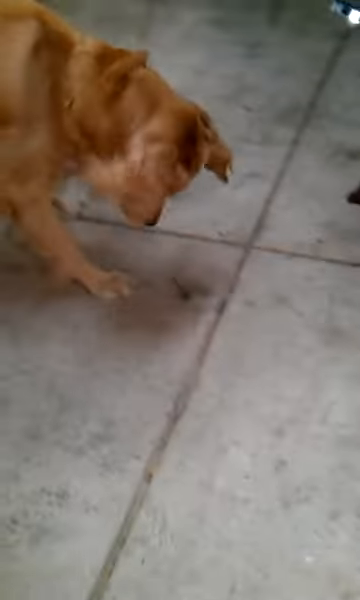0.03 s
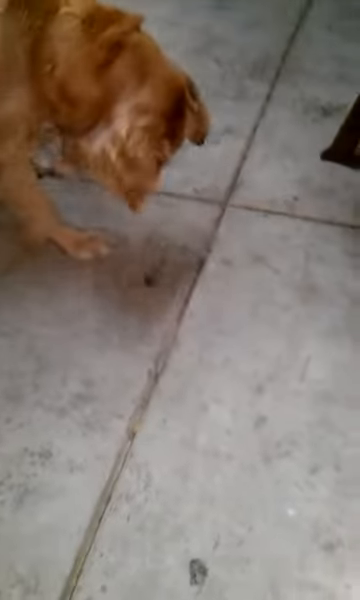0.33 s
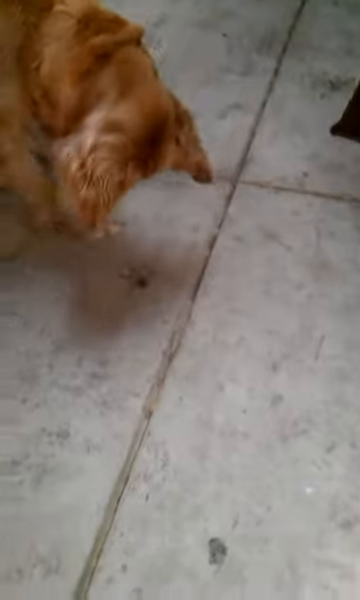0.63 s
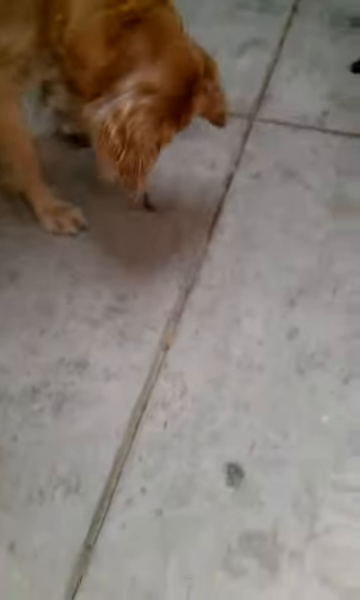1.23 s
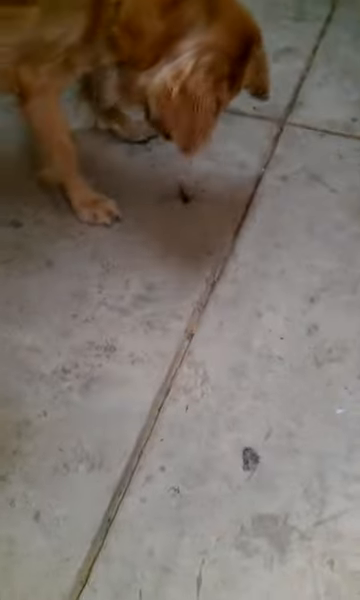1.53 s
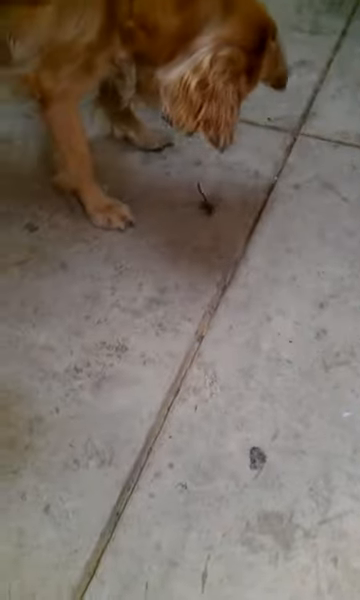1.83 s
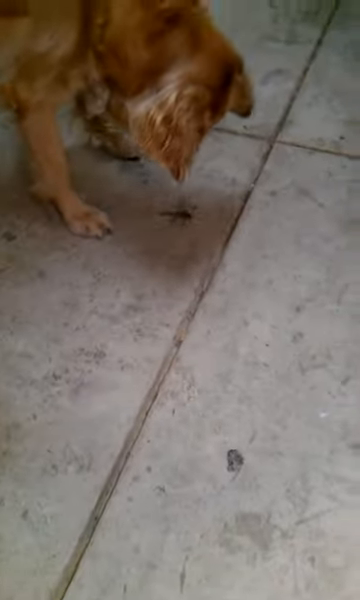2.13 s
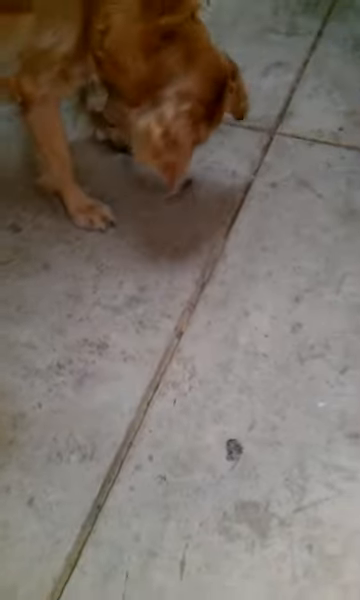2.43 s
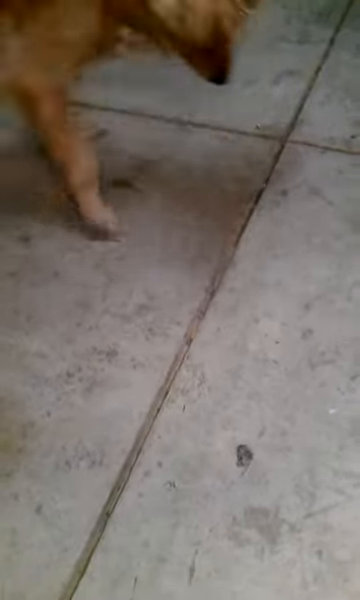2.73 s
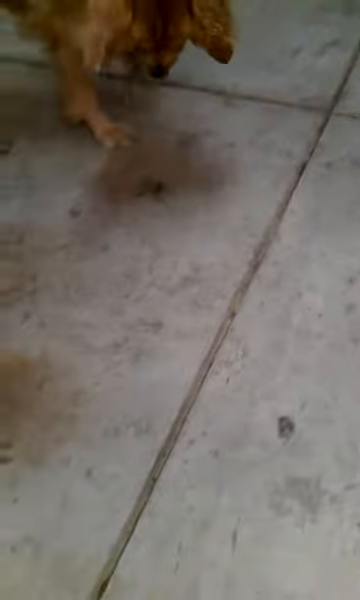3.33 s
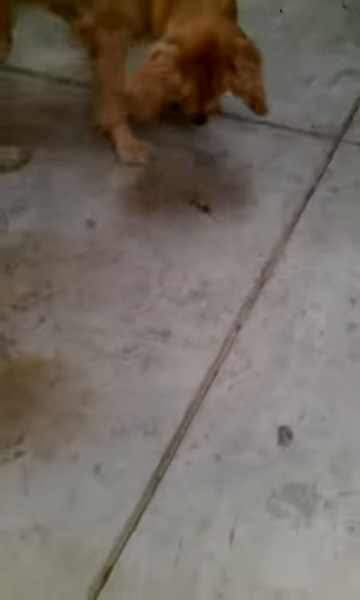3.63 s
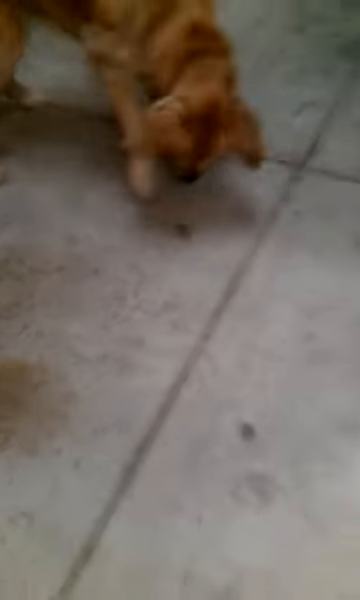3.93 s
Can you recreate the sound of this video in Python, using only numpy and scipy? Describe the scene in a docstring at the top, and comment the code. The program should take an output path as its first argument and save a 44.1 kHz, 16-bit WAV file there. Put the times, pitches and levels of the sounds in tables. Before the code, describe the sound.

Papery insect wings flutter and tick on a garage's concrete floor, fading while a dog's claws tap. One sharp knock sounds as the dog lunges, then the wings rattle again, with faint hiss and hum behind.

```python
"""A dog chases an insect

A large insect flutters on a concrete garage floor. Its dry wings rattle against it in bouts
of 25 to 35 strokes a second. A dog follows with soft paw steps and lunges once with a sharp,
clattering knock. Behind them are a low hiss, a faint hum and a few soft bumps."""
import sys
import numpy as np
from scipy import signal
from scipy.fft import rfft, irfft
from scipy.io import wavfile

SR = 44100
rng = np.random.default_rng(int(sys.argv[2]) if len(sys.argv) > 2 else 0)


def dump_mix(stems):
    """Bounce the given channels to the path in sys.argv[1] as a 16-bit WAV at rate SR."""
    frames = np.atleast_2d(stems).T  # one column per channel
    limited = np.clip(frames, -1, 1)  # hard clip at full scale
    pcm = np.round(limited * 32767).astype(np.int16)
    wavfile.write(sys.argv[1], SR, pcm)


N = 176400
TIME = np.arange(N) / SR


def amp(db):
    """Turns decibels into a gain."""
    return 10 ** (np.asarray(db) / 20)


def unit(x):
    """Scales a sound to an average power of 1."""
    return x / np.sqrt(np.mean(x ** 2) + 1e-20)


def look_up(points, hz):
    """Reads between a table's rows on a log frequency scale."""
    row_hz, value = np.transpose(points)
    return np.interp(np.log(hz + 1), np.log(row_hz + 1), value)


def add(mix, start_s, sound):
    """Mixes a sound in at its start time."""
    part = mix[max(round(start_s * SR), 0):][:len(sound)]
    part += sound[:len(part)]


def colour(x, tone, size=4096):
    """Filters a sound. The tone table sets only the balance of lows and highs."""
    log_gain = np.log(amp(look_up(tone, abs(np.fft.fftfreq(size, 1 / SR)))))
    ring = np.fft.ifft(np.exp(np.conj(signal.hilbert(log_gain)))).real[:size // 2]
    return signal.oaconvolve(x, ring / np.linalg.norm(ring))[:N]


def drift(rate_hz):
    """A random wander, mostly slower than the given rate."""
    rolloff = (1 + (np.fft.rfftfreq(N, 1 / SR) / rate_hz) ** 2) ** 2
    return unit(irfft(rfft(rng.standard_normal(N)) / rolloff, N))


def impulses(times, levels_db):
    """One spike for each contact."""
    out = np.zeros(N)
    for start, db in zip(times, levels_db):
        add(out, start, amp([db]))
    return out


def swells(rows):
    """Loudness curves that rise quickly and fall slowly."""
    out = np.zeros(N)
    for start, length, db in rows:
        add(out, start, amp(db) * np.sin(np.pi * np.linspace(0, 1, round(length * SR)) ** 0.58))
    return out


def rubbing(ticks, tick_share):
    """Blends ticks with smooth noise, sharing out the power."""
    return np.sqrt(tick_share) * unit(ticks) + np.sqrt(1 - tick_share) * rng.standard_normal(N)


# The garage's echo. Each row: frequency in Hz, seconds to fade by 60 dB.
ECHO_FADES = [(60,0.099),(600,0.21),(2500,0.098),(7500,0.18),(16000,0.15)]

def garage(x, echo_db):
    """Adds a short, dense tail of reflections."""
    hz, t, spectrum = signal.stft(rng.standard_normal(SR // 2), SR, nperseg=256)
    fade = amp(-60 * t / look_up(ECHO_FADES, hz)[:, None])
    tail = signal.istft(spectrum * fade, SR, nperseg=256)[1]
    tail *= np.minimum(np.arange(len(tail)) / SR / 0.0016, 1)
    return x + amp(echo_db) * signal.oaconvolve(x, tail / np.linalg.norm(tail))[:N]


def waver(hz, db):
    """A tone that wanders in pitch and level."""
    gain = amp(db + 2.86 * drift(rate_hz=4.6)) * np.sqrt(2)
    pitch = hz + 4 * drift(rate_hz=17.9)
    return gain * np.sin(2 * np.pi * np.cumsum(pitch) / SR)


# The tone of the hiss and of the bumps. Each row: frequency in Hz, relative level in dB.
HISS_TONE = [(20,-11),(55,-4),(100,-8.5),(190,-8.5),(350,-9),(560,-9),(750,-3.5),(950,-5),(1700,-3.5),(2400,1.5),(3200,-3),(4600,-8),(7500,-9.5),(9000,-22.5),(11500,-32),(16000,-25)]
BUMP_TONE = [(20,-10),(50,-1),(100,-8),(200,-14),(600,-40),(16000,-80)]
# The drone. Each row: time in seconds, pitch in Hz, level in dB.
DRONE_PATH = [(0,142.7,-65),(.5,143,-69.5),(.8,137,-71),(1.5,134,-70.5),(4,133,-73.5)]
# The hum. Each row: pitch in Hz, level in dB.
HUM_NOTES = [(360,-77),(403.5,-72),(672,-74),(748,-71),(808,-73),(1482,-75.5),(2420,-72)]
# The bumps. Each row: start in seconds, length in seconds, level in dB.
LOW_BUMPS = [(2.68,0.15,-60),(3.27,0.15,-60.5),(3.79,0.28,-63)]

def background():
    """A steady hiss, a distant drone, a faint hum and a few low bumps."""
    hiss = amp(-49 + .2 * drift(rate_hz=14)) * colour(rng.standard_normal(N), HISS_TONE)
    times, pitch, level = np.transpose(DRONE_PATH)
    drone = waver(np.interp(TIME, times, pitch), np.interp(TIME, times, level))
    hum = sum(waver(hz, db) for hz, db in HUM_NOTES)
    bumps = swells(LOW_BUMPS) * colour(rng.standard_normal(N), BUMP_TONE)
    return hiss + drone + hum + bumps


# The steps. Each row: start in seconds, pad level in dB, claw level in dB.
PAW_STEPS = [(0.089,-30,-35),(0.225,-36,-47),(.884,-28,-21.5),(1.3954,-30,-15.5),(1.3964,-31,-17.5),(1.3975,-20,-17),(1.404,-37,-22),(1.4085,-38,-25),(1.426,-28,-30),(2.708,-28.5,-44),(2.765,-26,-42),(2.948,-24,-45)]
# The scuffs. Each row: start in seconds, length in seconds, level in dB.
PAW_SCUFFS = [(.158,0.016,-41),(.184,.016,-44),(.704,.019,-39.5),(.724,.022,-44.5),(.805,.023,-36.5),(.825,.028,-41),(.853,.018,-43.5)]
# The tone of pads, claws and scuffs. Each row: frequency in Hz, relative level in dB.
PAD_TONE = [(30,-29),(150,-17),(240,-2),(500,-4),(900,-5),(2000,-28),(16000,-56)]
CLAW_TONE = [(100,-18),(600,-5.5),(1250,7.5),(1650,-1),(2250,8),(2800,-1),(3650,-2.5),(4700,-13),(5900,-14),(6750,-5),(8000,-15),(16000,-48)]
SCUFF_TONE = [(100,-30),(1200,-17),(2000,-2),(2600,4),(3300,3),(4500,-3),(7200,-1),(9000,-13),(16000,-30)]

def dog_paws(grit_per_s=1800):
    """Pads and claws land on the concrete and scuff along it."""
    times, pad_db, claw_db = np.transpose(PAW_STEPS)
    pads = colour(impulses(times, pad_db), PAD_TONE)
    claws = colour(impulses(times, claw_db), CLAW_TONE)
    grit = rng.standard_normal(N) * (rng.random(N) < grit_per_s / SR)
    scuffs = colour(swells(PAW_SCUFFS) * rubbing(grit, tick_share=.28), SCUFF_TONE)
    return garage(pads + claws + scuffs, echo_db=-5.5)


# The knock's contacts. Each row: start in seconds, click level in dB, relative thud level in dB.
CONTACTS = [(2.5387,1.5,-6),(2.5402,-6,-1),(2.5444,-13,-5.5),(2.5504,-24,-7),(2.5584,-1.5,-2.5),(2.5630,-0.5,-4),(2.5705,-11,2)]
# The tone of a click and of a thud. Each row: frequency in Hz, relative level in dB.
CLICK_TONE = [(60,-32),(1000,-12),(2400,-10),(3600,0),(4500,0),(5500,-8),(6500,-4.5),(7450,3),(8600,-5.5),(10500,-17),(11800,-23),(12600,-46),(16000,-60)]
THUD_TONE = [(25,-17),(75,7),(150,-1.5),(290,-6.5),(450,-14),(630,4),(850,-6.5),(1300,0),(2200,-3.5),(4000,-20.5),(9000,-23),(12600,-56),(16000,-68)]
# A thud's ring. Each row: pitch in Hz, relative level in dB, seconds to fade by 60 dB.
RING_NOTES = [(590,-58,.09),(650,-65,.2),(1320,-62,.13)]

def dog_lunge():
    """A quick clatter of hard contacts, each a click and a hollow thud with a short ring."""
    times, click_db, thud_db = np.transpose(CONTACTS)
    clicks = colour(impulses(times, click_db), CLICK_TONE)
    blows = impulses(times, thud_db)
    t = TIME[:SR // 3]
    ring = sum(amp(db - 60 * t / fade_s) * np.sin(2 * np.pi * hz * t) for hz, db, fade_s in RING_NOTES)
    thuds = amp(-8) * colour(blows, THUD_TONE) + signal.oaconvolve(blows, ring)[:N]
    return garage(clicks, echo_db=-9) + garage(thuds, echo_db=-7.5)


# The wing hits. Each row: start in seconds, relative level in dB, seconds to fade to about a third.
WING_STROKES = [(.01,-34,0.013),(0.042,-36.5,.008),(.071,-37,.005),(.098,-34,.005),(.156,-36.5,0.01),(.187,-38,.009),(.216,-34,.008),(.245,-49,.01),(.3085,-33.5,0.0027),(.347,-35.5,.007),(.386,-34.5,.015),(.415,-38.5,.008),(.46,-37,.009),(.551,-43,.014),(0.601,-37.5,.007),(.635,-37,.006),(.672,-34.5,0.0065),(.707,-41,.009),(.739,-35.5,.007),(0.772,-37,.017),(.806,-50,.012),(0.852,-46,.004),(0.906,-37,.009),(.95,-40,0.015),(.987,-38.5,.01),(1.035,-47,.01),(1.068,-43,.014),(1.104,-42,.01),(1.152,-38,0.012),(1.2,-41.5,.011),(1.484,-53,.016),(1.553,-51,.006),(1.586,-51,.006),(1.625,-46.5,0.0055),(1.669,-44.5,.005),(1.711,-49,0.0045),(1.755,-46,.005),(1.793,-47,.007),(1.835,-54,.006),(1.877,-53,.008),(1.918,-51,.008),(2.342,-48,.005),(2.377,-46,.005),(2.408,-46,.006),(2.433,-44,.012),(2.461,-47,.01),(2.664,-40,0.019),(2.918,-29,0.005),(2.962,-37,0.018),(2.985,-35,0.0091),(3.016,-39.5,.01),(3.039,-36.5,.01),(3.068,-33.5,.008),(3.097,-33,.008),(3.127,-39,.007),(3.154,-40,.008),(3.183,-30,0.0049),(3.214,-40,.01),(3.24,-32.5,.013),(3.27,-34.5,0.012),(3.299,-38,0.012),(3.46,-37,0.0065),(3.492,-39.5,.012),(3.525,-38,0.017),(3.569,-41,.012),(3.661,-37,0.0086),(3.686,-44,0.0082),(3.709,-39.5,0.015),(3.745,-47,.014),(3.784,-39.5,.015),(3.9,-31.5,.006),(3.934,-32,0.011),(3.971,-35,.01)]
# The tone of a hit. Each row: frequency in Hz, relative level in dB.
HIT_TONE = [(100,-43),(900,-33),(1600,-14.5),(2600,-12),(4300,-18.5),(5500,-7),(6500,-2.5),(7450,4.5),(8300,0),(9800,-3),(11200,-14.5),(13000,-16),(16000,-11.5)]

def wing_hits(rise_s=.0028, snap_count=6, snap_spread_s=.015, snap_share=.24, size=4096):
    """Each stroke brushes the floor with a few dry snaps of the wing veins."""
    t, hz = TIME[:size], np.fft.rfftfreq(size, 1 / SR)
    patch_hz = np.arange(128) * 330.4
    out = np.zeros(N)
    for start, db, fade_s in WING_STROKES:
        shape = np.minimum(t / rise_s, 1) * np.exp(-np.maximum(t - rise_s, 0) / fade_s)
        delays = (np.arange(snap_count) + rng.random(snap_count)) / snap_count * snap_spread_s
        snaps = np.zeros(size)
        for delay, sign in zip(delays, rng.choice([-1, 1], snap_count)):
            add(snaps, delay, np.array([sign]))
        brush = unit(shape * rng.standard_normal(size))
        hit = np.sqrt(1 - snap_share) * brush + np.sqrt(snap_share) * unit(shape * snaps)
        # A random ripple across the spectrum gives each hit its own patchy tone.
        patch_db = 4 * np.interp(hz, patch_hz, rng.standard_normal(len(patch_hz)))
        hit = irfft(rfft(hit) * amp(patch_db))[:size // 2]
        hit = colour(hit, HIT_TONE)[:size]
        add(out, start, amp(db - 1) * unit(hit) * np.sqrt(np.mean(shape ** 2)))
    return out


# The rustle between hits. Each row: time in seconds, level in dB.
RUSTLE_LEVELS = [(0,-44.5),(.42,-45),(.52,-47),(.66,-46),(.78,-41.5),(.89,-47.5),(1,-44.5),(1.19,-46),(1.3,-58.5),(1.75,-57),(2.1,-61),(2.35,-58),(2.46,-51),(2.72,-51.5),(2.9,-59.5),(2.94,-44),(3.3,-43),(3.39,-55.5),(3.44,-53),(3.48,-47),(3.78,-46),(3.87,-53),(3.92,-45.5),(4,-45.5)]
# Its tone. Each row: frequency in Hz, relative level in dB.
RUSTLE_TONE = [(100,-27.5),(900,-22.5),(1600,-12),(2500,-3.5),(3200,-4),(4300,-6),(5500,-3),(6500,-1.5),(7400,0.5),(8300,-2),(9800,-5.5),(11200,-13.5),(13000,-15.5),(16000,-15)]

def wing_rustle(ticks_per_s=900, jitter=.6):
    """The wing edges chatter on the floor in a fast, uneven run of tiny ticks."""
    level_db = np.interp(TIME, *np.transpose(RUSTLE_LEVELS)) + 1.2 * drift(rate_hz=31)
    tick_rate = ticks_per_s * np.exp(jitter * drift(rate_hz=500))
    ticks_so_far = np.floor(np.cumsum(tick_rate) / SR)
    ticks = np.diff(ticks_so_far, prepend=0) * rng.choice([-1, 1], N)
    return colour(amp(level_db) * rubbing(ticks, tick_share=.23), RUSTLE_TONE)


# The wings' brightness. Each row: time in seconds, treble boost or cut in dB.
BRIGHTNESS = [(0,-1.5),(.66,0),(.8,-6),(.95,-1.5),(1.2,-2.5),(1.7,4),(2.4,-0.5),(3.1,3),(3.5,3.5),(4,-1.5)]

def insect(treble_hz=9000):
    """Wing hits over a papery rustle that comes in bouts, now duller, now brighter."""
    wings = wing_hits() + wing_rustle()
    treble = signal.sosfiltfilt(signal.butter(4, treble_hz, "high", fs=SR, output="sos"), wings)
    treble_gain = amp(np.interp(TIME, *np.transpose(BRIGHTNESS)))
    return garage(wings + (treble_gain - 1) * treble, echo_db=-9.5)


def scene():
    """Insect, dog and background together in one channel."""
    return (insect() + dog_lunge() + dog_paws() + background())[None]


def record(dry):
    """Cuts off the very highest treble, above 15760 Hz."""
    low_pass = signal.firwin(511, 15760, window=("kaiser", 9), fs=SR)
    return signal.oaconvolve(dry, low_pass[None], "same")


dry = scene()
out = record(dry)
dump_mix(out)
```